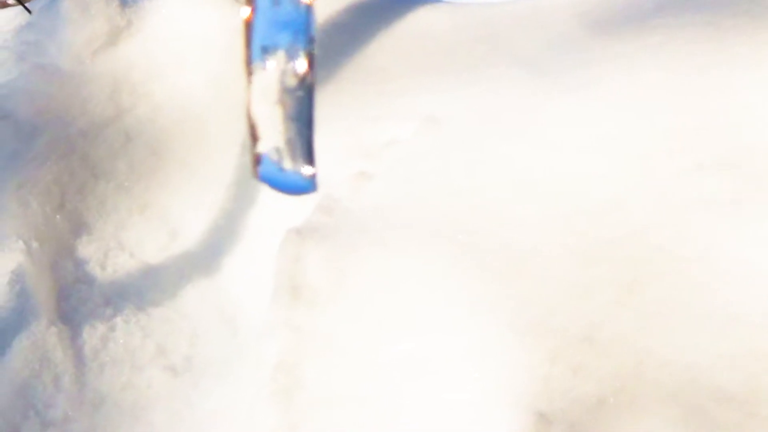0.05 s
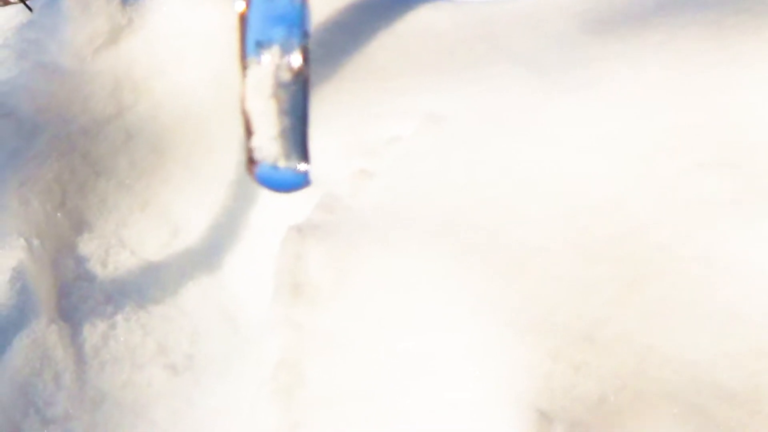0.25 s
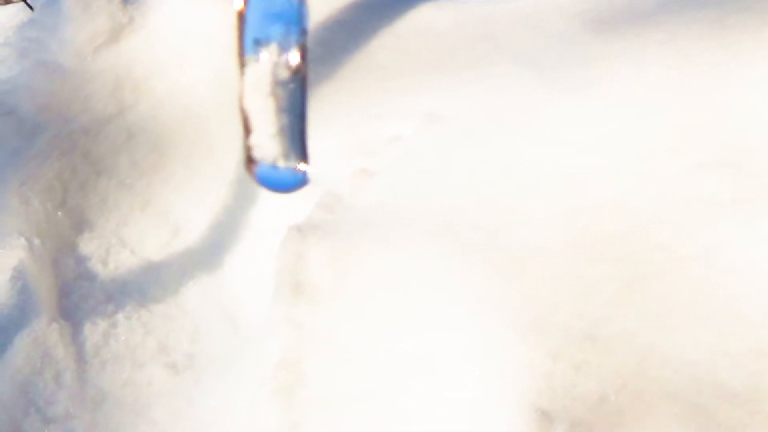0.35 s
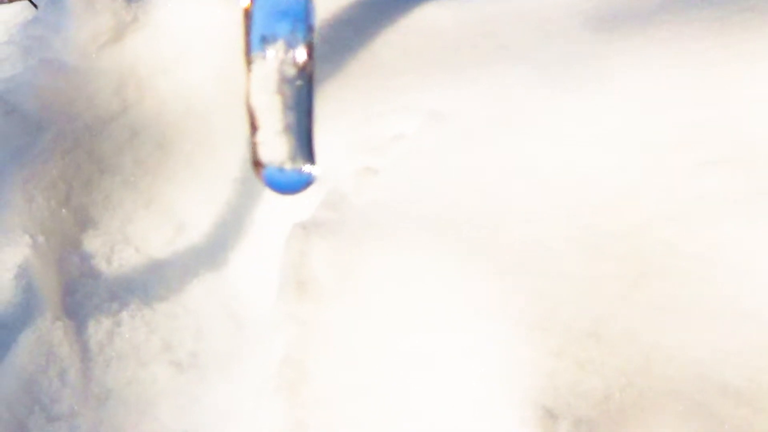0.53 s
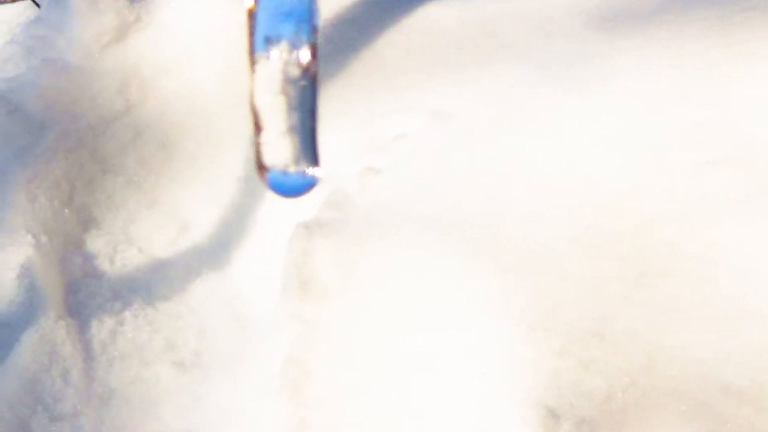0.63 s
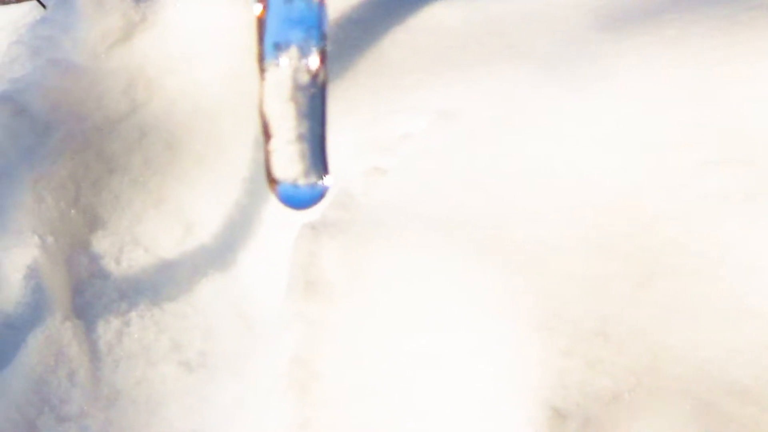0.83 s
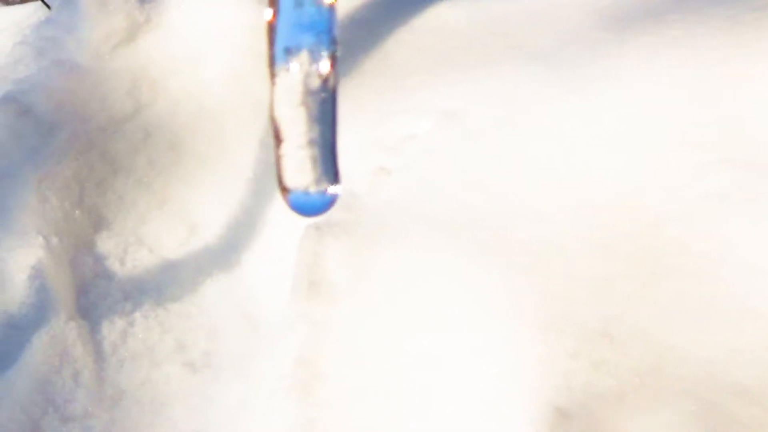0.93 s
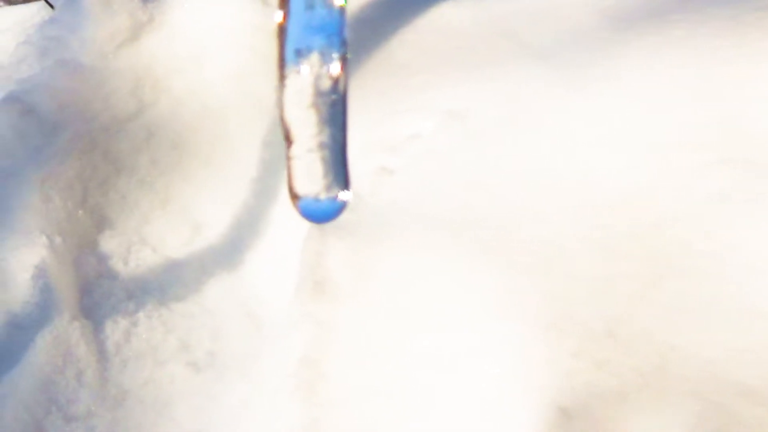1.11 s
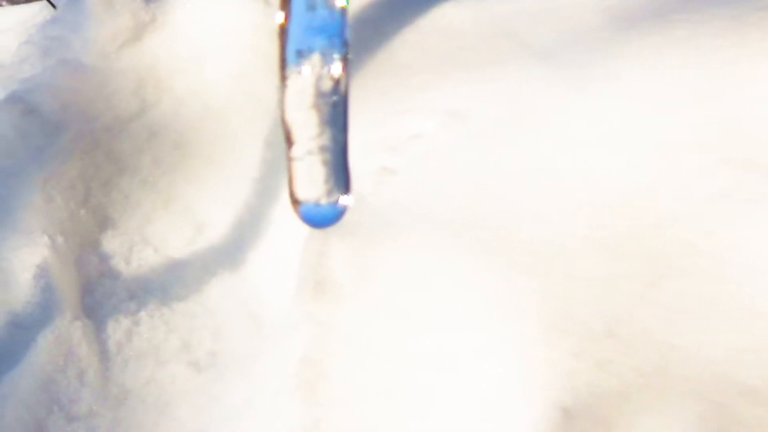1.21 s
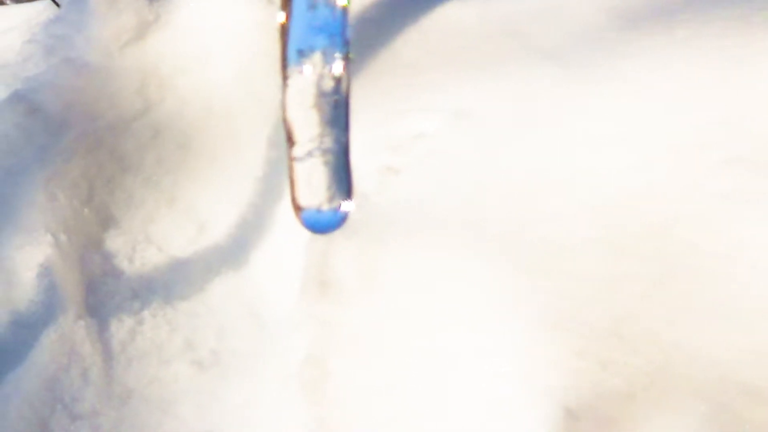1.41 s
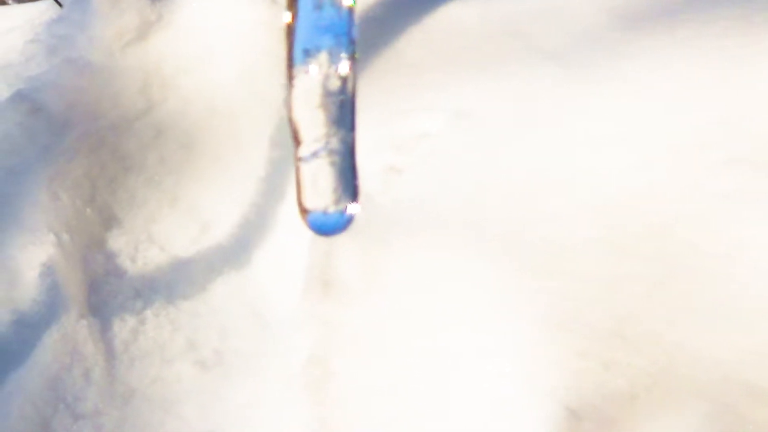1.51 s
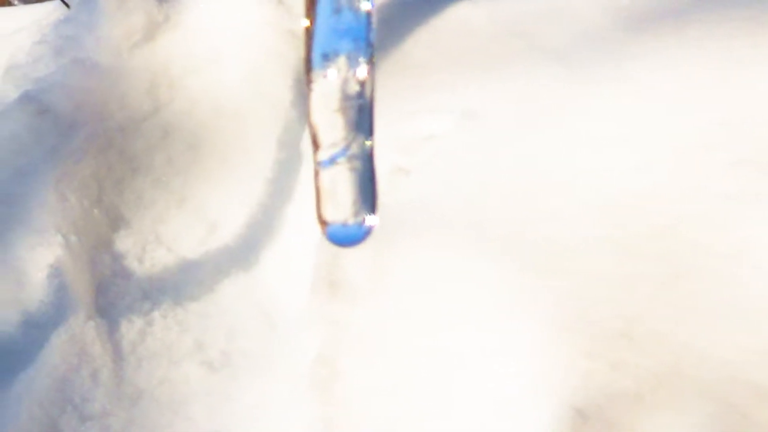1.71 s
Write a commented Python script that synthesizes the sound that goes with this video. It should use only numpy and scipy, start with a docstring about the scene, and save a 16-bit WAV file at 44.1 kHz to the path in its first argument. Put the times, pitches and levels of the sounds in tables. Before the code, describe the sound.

Close drip from a melting icicle, a soft tick followed at once by a bright snapping double click and short hollow ring, in a quiet snowy outdoor place; very faint hiss, low hum and later distant drips.

```python
"""Meltwater drips close by in a quiet, snowy place, over a soft hiss, a rumble and a slowly growing low hum.
Noise shaped in frequency gives the hiss and rumble; sines wavering in pitch and level give the hum.
First comes a light tick, then a sharp double click on a hollow surface: every contact is a falling
sine snap, a ring of surface modes and a splash of noise, and decaying noise answers as a brief echo.
Later a few faint drips fall farther off, each a fading band of noise."""
import sys
import numpy as np
from scipy import signal
from scipy.fft import rfft, irfft, next_fast_len
from scipy.io import wavfile
from scipy.ndimage import map_coordinates

SR = 44100
rng = np.random.default_rng(int(sys.argv[2]) if len(sys.argv) > 2 else 0)


def transcribe(u):
    """Save the signal u as a 16-bit wav file named by the first command-line argument.

    u: samples, shape (n,) or (channels, n), limited to [-1, 1]; the rate is SR.
    q: integer samples, one column per channel.
    """
    v = np.clip(np.atleast_2d(u).T, -1, 1)
    q = np.round(v * 32767).astype(np.int16)
    wavfile.write(sys.argv[1], SR, q)


N = 77175  # length in samples, 1.75 s


def amp(db):
    """Decibel law: 20 dB is a factor of ten in amplitude."""
    return 10 ** (np.asarray(db) / 20)


def unit(x):
    """Normalisation to a root-mean-square of 1."""
    return x / np.sqrt(np.mean(x ** 2) + 1e-20)


def along(points, hz):
    """Interpolation of (Hz, value) points along a logarithmic frequency axis."""
    point_hz, values = np.transpose(points)
    return np.interp(np.log(hz + 1), np.log(point_hz + 1), values)


def wobble(rate):
    """Slow random modulation: a spline through random knots, rate knots a second."""
    knots = rng.standard_normal(int(N * rate / SR) + 4)
    return map_coordinates(knots, [np.arange(N) * rate / SR])


def filtered(x, response):
    """Linear filtering: the spectrum of x times a response of frequency."""
    size = next_fast_len(N + SR // 2)
    spectrum = rfft(x, size) * response(np.fft.rfftfreq(size, 1 / SR))
    return irfft(spectrum, size)[..., :N]


def fade(t, t60):
    """Exponential decay: the level is 60 dB down at t60."""
    return np.exp(-np.log(1000) * t / t60)


def onset(t, rise_s):
    """Exponential approach to full amplitude, with time constant rise_s."""
    return 1 - np.exp(-t / rise_s)


def add(track, start_s, sound):
    """Superposition: sum a sound into a track from its start time."""
    part = track[round(start_s * SR):][:len(sound)]
    part += sound[:len(part)]


# Likeness of left and right in diffuse noise. Each row: frequency in Hz, correlation from 0 to 1.
LIKENESS = [(60, 1.0), (120, 0.91), (260, 0.47), (530, 0.26), (1100, 0.33), (2260, 0.47), (4680, 0.94),
            (9670, 1)]


def stereo_noise(spectrum):
    """Partial coherence: independent mid and side noises share the power by the left-right correlation."""
    def mid_and_side_gains(hz):
        angle = np.arccos(np.clip(along(LIKENESS, hz), -1, 1)) / 2
        return amp(along(spectrum, hz)) * [np.cos(angle), np.sin(angle)]

    mid, side = filtered(rng.standard_normal((2, N)), mid_and_side_gains)
    return unit(np.array([mid + side, mid - side]))


# Spectrum of the hiss. Each row: frequency in Hz, relative level in dB.
HISS_SPECTRUM = [(53, -35), (90, -3), (103, -12.5), (134, -1.5), (237, -8.5), (306, -3), (345, -9.5),
                 (412, -1.5), (464, -9.5), (502, -6.5), (577, -12), (636, -10.5), (1300, -16), (4500, -22),
                 (10100, -31.5), (13200, -100), (22000, -120)]
# Spectrum of the rumble. Each row: frequency in Hz, relative level in dB.
RUMBLE_SPECTRUM = [(15, -15.5), (25, 8.5), (35, -15.5), (55, -4), (78, 1.5), (105, -11), (200, -64)]
# Partials of the hum. Each row: mean frequency in Hz, rms level in dB at mid-scene,
# unsteadiness of pitch and level as a share.
HUM_PARTIALS = [(25.6, -69.5, .4), (51, -62, 0.32), (304.3, -79, .9), (405.3, -75.5, 0.915)]
HISS_DB, RUMBLE_DB = -60.5, -63  # rms
HUM_WANDER_HZ, HUM_GROWS_DB_PER_S = 11.61, 4  # the wander is scaled by each partial's unsteadiness


def background():
    """Stationary shaped noise, with a hum of partials modulated at random in frequency and amplitude."""
    t = np.arange(N) / SR
    hum = np.zeros(N)
    for hz, db, unsteady in HUM_PARTIALS:
        pitch = hz + unsteady * HUM_WANDER_HZ * wobble(18)
        sine = np.sin(2 * np.pi * np.cumsum(pitch) / SR)
        hum += amp(db) * unit(sine * (1 + unsteady * wobble(9.26)))
    growth = amp(HUM_GROWS_DB_PER_S * (t - t.mean()))
    hiss = amp(HISS_DB) * stereo_noise(HISS_SPECTRUM)
    rumble = amp(RUMBLE_DB) * stereo_noise(RUMBLE_SPECTRUM)
    return hiss + rumble + hum * growth


# Contacts of water with the surface. Each row: start in seconds, settled snap pitch in Hz,
# snap level in dB, snap t60 in seconds, ring level in dB, splash level in dB,
# splash t60 in seconds, treble roll-off of ring and splash in Hz.
CONTACTS = [(.2260, 2800, -50.5, 0.017, -53.5, -45.5, .025, 3470),
            (.2272, 1002, -36.5, 0.075, -64, -59, 0.035, 2000),
            (0.2289, 5330, -38.5, 0.02, -56.5, -41, 0.019, 7840),
            (0.2508, 1095, -42.5, 0.042, -58.5, -62, .02, 1490),
            (0.27, 1100, -50, 0.14, -57, -38.5, 0.017, 2080),
            (.3076, 4170, -39, 0.012, -42, -42, 0.038, 4800),
            (.3210, 3870, -42.5, 0.018, -38, -42, 0.026, 6000),
            (.3272, 5220, -11.5, 0.0071, -35, -30.5, 0.038, 9100),
            (.3287, 3998, -20, .011, -41, -50, .012, 8100),
            (0.3309, 3800, -22.5, 0.0083, -43, -28, 0.014, 7060),
            (.3358, 2512, -19.5, 0.013, -33, -36, 0.017, 4340),
            (0.3395, 1903, -32, 0.03, -40.5, -48.5, 0.074, 3000),
            (.3460, 1079, -43, 0.061, -47, -42.5, 0.064, 3800)]
# Modes of the struck surface. Each row: frequency in Hz, mean relative level in dB, t60 in seconds.
SURFACE_MODES = [(925, -14, .11), (1087, -1, .085), (1135, -9, .08), (1464, -18, .15), (1645, -12, .1),
                 (1892, -2, .1), (2160, -12, .1), (2270, -11, .14), (2565, -9, .07), (2942, -10, .055),
                 (3060, -9, .06), (3516, -2, .052), (4090, -6, .06), (4350, -7, .065)]
# Spectrum of the splash before roll-off. Each row: frequency in Hz, relative level in dB.
SPLASH_SPECTRUM = [(400, -40), (750, -37), (1000, 11), (1300, -18), (1550, 0), (2600, -11), (3250, -3),
                   (4000, 2), (5400, 1.5), (6500, -4), (8000, -8), (10000, -28.5)]
SPRAY_DB, SPRAY_T60_S = -15, 0.072  # level relative to the splash
SNAP_RISE_S, RING_RISE_S = 0.00072, 0.0021  # time constants
SNAP_START_SHARP, SNAP_SETTLE_S = 0.38, 0.00051  # share above the settled pitch, time constant
MODE_SCATTER_DB = 0.5  # standard deviation of each mode's level from contact to contact
ROLL_OFF_POWER = 4.7


def near_drips():
    """Impact excitation: a falling snap, modal ringing and a noise splash ending in fine spray."""
    out, t = np.zeros(N), np.arange(SR // 4) / SR
    mode_hz, mode_db, mode_t60 = np.transpose(SURFACE_MODES)[:, :, None]
    modes = np.sin(2 * np.pi * mode_hz * t) * fade(t, mode_t60) * onset(t, RING_RISE_S)
    rise = onset(t, SNAP_RISE_S)
    # running integral of the pitch ratio, so that phase follows the falling pitch
    glide = np.cumsum(1 + SNAP_START_SHARP * np.exp(-t / SNAP_SETTLE_S)) / SR
    for start_s, snap_hz, snap_db, snap_t60, ring_db, splash_db, splash_t60, roll_off_hz in CONTACTS:
        def roll_off(hz):
            return 1 / (1 + (hz / roll_off_hz) ** ROLL_OFF_POWER)

        snap = np.sin(2 * np.pi * snap_hz * glide) * fade(t, snap_t60) * rise

        scattered_db = mode_db + MODE_SCATTER_DB * rng.standard_normal(mode_hz.shape)
        ring = np.sum(modes * roll_off(mode_hz) * amp(scattered_db), axis=0)

        noise = filtered(rng.standard_normal(N), lambda hz: amp(along(SPLASH_SPECTRUM, hz)) * roll_off(hz))
        decay = fade(t, splash_t60) + amp(SPRAY_DB) * fade(t, SPRAY_T60_S)
        splash = unit(noise)[:len(t)] * rise * decay

        add(out, start_s, amp(snap_db) * snap + amp(ring_db) * ring + amp(splash_db) * splash)
    return out


# Decay of the echo. Each row: frequency in Hz, t60 in seconds.
ECHO_T60 = [(500, 0.27), (2000, 0.38), (5000, 0.19), (9000, 0.2)]
ECHO_DB, ECHO_RISE_S = -17, 0.0013  # level of the mid response, time constant of its onset
ECHO_WIDTH = 0.9  # gain of the side response


def surroundings(x):
    """Reverberation: convolution with noise whose decay time depends on frequency."""
    hz, t, bands = signal.stft(rng.standard_normal((2, SR // 2)), SR, nperseg=256)
    decay = fade(t, along(ECHO_T60, hz)[:, None])
    tail = signal.istft(bands * decay, SR, nperseg=256)[1]
    tail = tail * onset(np.arange(tail.shape[1]) / SR, ECHO_RISE_S)
    tail = tail / np.linalg.norm(tail[0])  # unit energy in the mid response
    mid, side = signal.fftconvolve(x[None], tail, axes=1)[:, :N]
    return amp(ECHO_DB) * np.array([mid + ECHO_WIDTH * side, mid - ECHO_WIDTH * side])


# Faint drips farther off. Each row: start in seconds, centre pitch in Hz, level in dB,
# t60 in seconds, width (standard deviation) in octaves.
FAR_DRIPS = [(0.661, 1660, -57, .07, 0.98), (1.6572, 650, -43, .012, 0.58), (1.665, 700, -45.5, .014, .5),
             (1.669, 1340, -53.5, 0.016, 0.3), (1.731, 1980, -64, 0.16, .08)]


def far_drips():
    """Band-limited noise under exponential decay: soft pats, the narrower bands more pitched."""
    out, t = np.zeros(N), np.arange(SR // 4) / SR
    for start_s, centre_hz, db, t60, octaves in FAR_DRIPS:
        def bell(hz):
            return np.exp(-0.5 * (np.log2((hz + 1) / centre_hz) / octaves) ** 2)

        band = unit(filtered(rng.standard_normal(N), bell))[:len(t)]
        add(out, start_s, amp(db) * band * fade(t, t60) * onset(t, RING_RISE_S))
    return out


DRIP_PAN_DB = -0.5  # left relative to right


def scene():
    """Superposition of drips placed by level difference, their echo and the background."""
    drips = near_drips() + far_drips()
    panned = drips * amp([[DRIP_PAN_DB / 2], [-DRIP_PAN_DB / 2]])
    return panned + surroundings(drips) + background()


TOP_HZ = 10300


def record(dry):
    """Band limitation: nothing passes at or above the top frequency."""
    return filtered(dry, lambda hz: hz < TOP_HZ)


dry = scene()
out = record(dry)
transcribe(out)
```